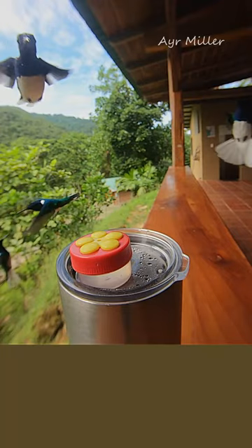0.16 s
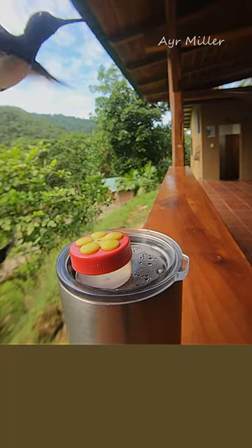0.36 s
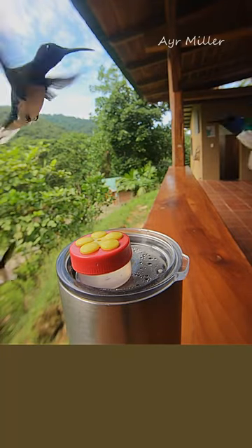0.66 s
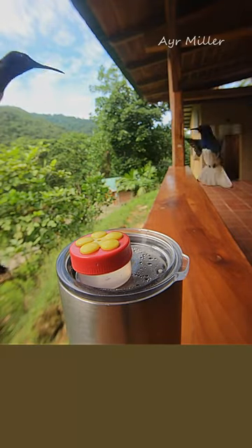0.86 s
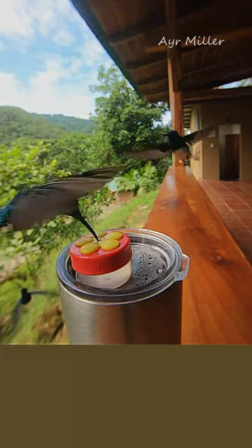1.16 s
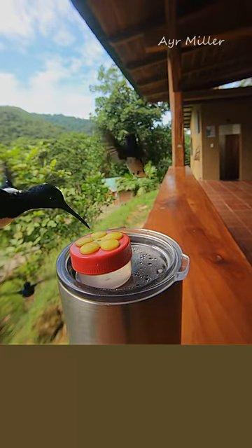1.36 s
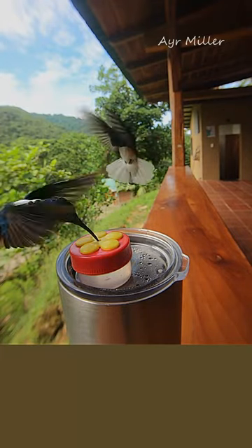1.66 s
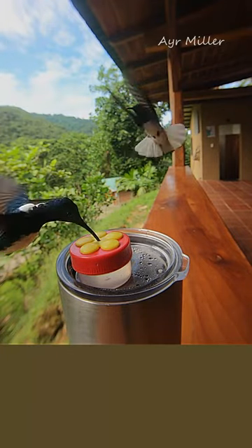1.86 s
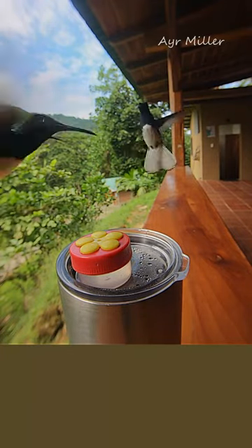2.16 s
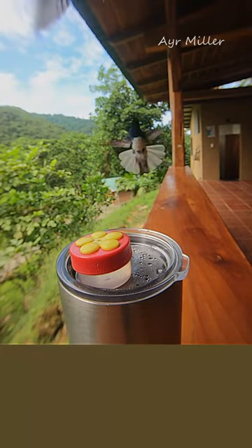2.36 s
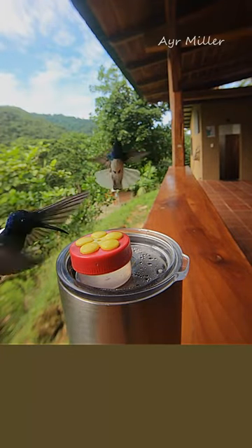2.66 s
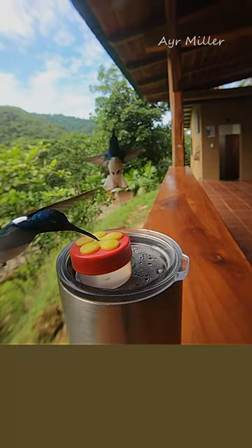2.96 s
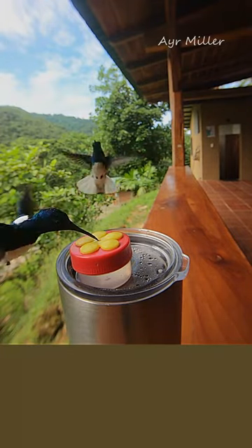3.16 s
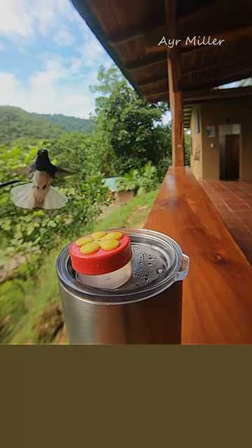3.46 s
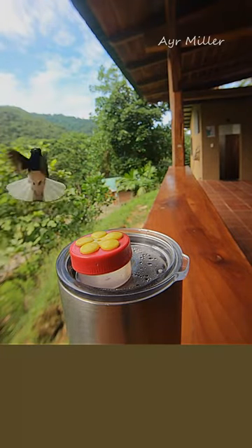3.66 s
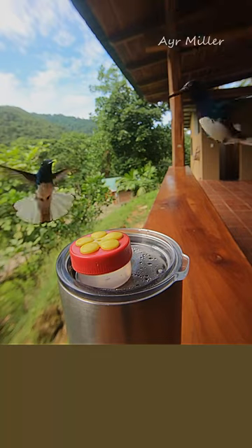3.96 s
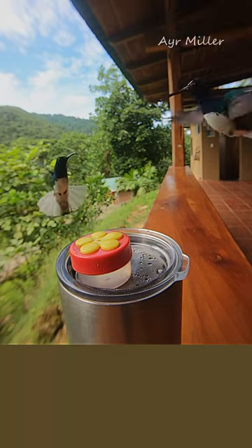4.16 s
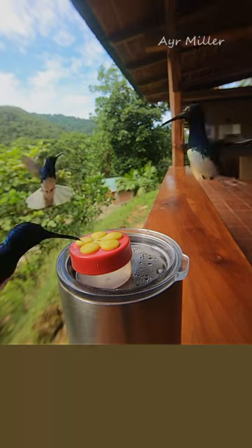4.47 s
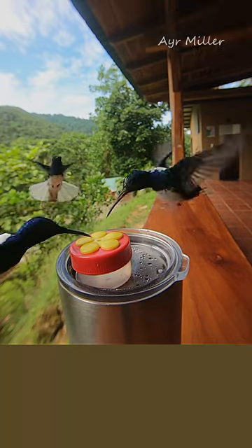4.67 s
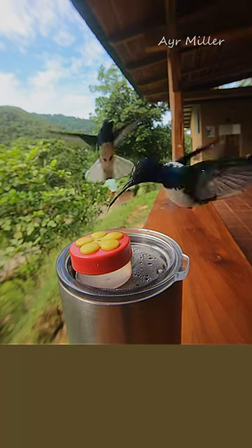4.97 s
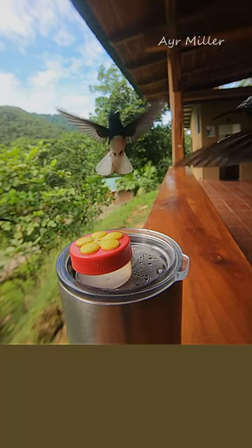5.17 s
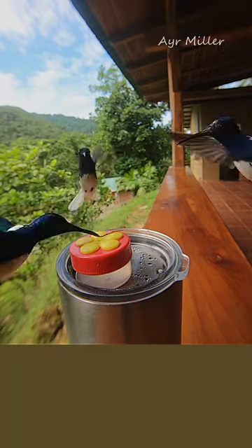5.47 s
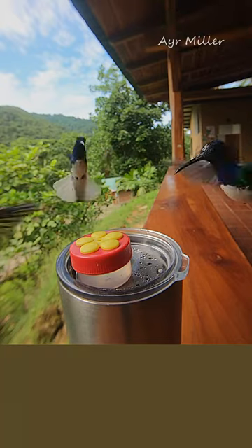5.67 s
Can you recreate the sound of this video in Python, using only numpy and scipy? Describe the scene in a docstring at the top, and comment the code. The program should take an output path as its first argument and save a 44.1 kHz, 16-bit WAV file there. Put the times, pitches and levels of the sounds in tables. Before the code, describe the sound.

Hummingbirds hover and dart close to a microphone on an open veranda. From 0 s low wing hums, roughly 30 to 40 soft beats per second, pulse with airy puffs and dry feather flicks; a clear tick lands at 0.1 s and a quick falling chirp at 0.55 s. After a brief thinning near 0.7 s, passes swell at 1.3 and 1.5 s, then a steady hover leads into a stronger, faster rush at 2.15 s. A quieter gap follows, then a steady purr from 2.6 to 3.4 s and another surge at 3.5 s. A small snap at 3.75 s precedes renewed hovering; the loudest rush comes around 4.9 s with a sharp snap. Overlapping hums stay strong to the end, near 5.8 s. Behind are faint leaf hiss, shimmering insects peaking near 3.65 s, sparse weak high chips, thin flickering high tones and farther wings, with short diffuse echoes.

```python
"""Low fluttering hums swell and dart past close by: hummingbirds around a feeder on a veranda.
Each wing stroke is a soft pulse of locked wingbeat multiples, a puff of shaped noise and feather flicks.
Beaks and feathers tick as snaps or short rings, and chips are gliding sines; both get diffuse echoes.
Behind them, filtered noise makes leaf hiss and an insect chorus, sines make thin high tones,
and two more birds hum farther off."""
import sys
import numpy as np
from scipy import signal
from scipy.fft import rfft, irfft, next_fast_len
from scipy.io import wavfile

SR = 44100
rng = np.random.default_rng(int(sys.argv[2]) if len(sys.argv) > 2 else 0)


def wav_out(sig):
    """Save sig, one row per channel (or a flat mono array), as 16-bit PCM at SR to the path in sys.argv[1]."""
    wavfile.write(sys.argv[1], SR, np.round(np.clip(np.atleast_2d(sig).T, -1, 1) * 32767).astype(np.int16))


N = 255942
T = np.arange(N) / SR


def gain_of(db):
    """Decibels to gain."""
    return 10 ** (np.asarray(db) / 20)


def evened(x):
    """Scales to rms 1."""
    return x / np.sqrt(np.mean(x ** 2) + 1e-20)


def add(mix, start_s, sound):
    """Mixes a sound in at start_s seconds, cut at the end of the mix."""
    part = mix[round(start_s * SR):][:len(sound)]
    part += sound[:len(part)]


def noise(points, size=N):
    """Steady noise of rms 1, its spectrum drawn through (frequency [Hz], relative density [dB])."""
    point_hz, point_db = np.transpose(points)
    count = next_fast_len(size)
    hz = np.fft.rfftfreq(count, 1 / SR)
    shape_db = np.interp(np.log(hz + 1), np.log(point_hz + 1), point_db)
    spectrum = rfft(rng.standard_normal(count)) * gain_of(shape_db)
    return evened(irfft(spectrum, count)[:size])


def drift(hz, t=T):
    """Slow chance wandering with rates up to hz, rms about 1."""
    curve = evened(signal.resample(rng.standard_normal(200), 4000))
    return np.interp(t * hz * 40 % 4000, np.arange(4000), curve)


def ring(x, hz, width):
    """Two-pole resonance of peak gain 1, width in Hz."""
    return signal.lfilter(*signal.iirpeak(hz, hz / width, SR), x)


def leaf_hiss():
    """Leaves in the trees hiss as broad noise whose level wanders slightly."""
    # hiss spectrum: (frequency [Hz], relative density [dB])
    leaf_spectrum = [(120, -18), (200, 8.5), (359, -4.5), (863, -11.5), (929, -11.5), (1100, -12),
                     (1440, -18.5), (2080, -17), (2490, -22.5), (3400, -14.5), (4480, -10.5), (11200, -25),
                     (15800, -42)]
    level_db = -40.5 + 0.84 * drift(hz=4.)
    return gain_of(level_db) * noise(leaf_spectrum)


def insect_chorus():
    """Many insects merge into narrow bands of noise, each shimmering in level."""
    # level of the whole chorus: (time [s], level [dB])
    chorus_level = [(0, -63), (.6, -47), (1.5, -46), (2.5, -45.5), (3.5, -43.5), (3.65, -40.5),
                    (3.8, -43.5), (4.6, -47.5), (5.1, -53.5), (5.8, -56)]
    # chorus bands: (centre [Hz], width of each of two filter passes [Hz], relative level [dB])
    insect_bands = [(4480, 600, 0.5), (4788, 110, -5.5), (5190, 620, -6.5), (3730, 970, -3.5),
                    (4443, 21, -8), (4680, 45, -8.5), (4860, 25, -12.5), (4350, 30, -9)]
    chorus = np.zeros(N)
    for hz, width, db in insect_bands:
        band = ring(ring(rng.standard_normal(N), hz, width), hz, width)
        chorus += gain_of(db + 1.8 * drift(hz=25.)) * evened(band)
    return evened(chorus) * gain_of(np.interp(T, *np.transpose(chorus_level)))


def faint_tones():
    """Thirty faint high sines come and go by chance, each wavering in phase."""
    # the spread of tones: lowest [Hz], highest [Hz], gain ahead of the chance swells [dB]
    low_hz, high_hz, gain_db = 6500, 11400, -63
    pitches = np.linspace(low_hz, high_hz, 30) + rng.uniform(-80, 80, 30)
    tones = np.zeros(N)
    for hz in pitches:
        swell = np.clip(drift(hz=4.) - .7, 0, 1)  # silent unless the drift is high
        tones += swell * np.sin(2 * np.pi * hz * T + .6 * drift(hz=8.))
    return gain_of(gain_db) * tones


def thin_tones():
    """Thin high tones: sines of steady pitch that fade in and out and flicker."""
    # clearest high tones: (start [s], end [s], pitch [Hz])
    high_tones = [(0, 1.1, 10800), (.05, 1.05, 9430), (0.698, 1.26, 8550), (.9, 1.7, 6740),
                  (1.0, 2.0, 9360), (1.545, 2.6, 8400), (2.0, 3.12, 9360), (3.7, 4.27, 10900),
                  (3.8, 4.26, 9360), (4.6, 5.2, 10651), (5.1, 5.482, 9360)]
    out = np.zeros(N)
    for start, end, hz in high_tones:
        fade = np.clip(np.minimum(T - start, end - T) / .08, 0, 1)
        level_db = -61 + 3 * drift(hz=7.)
        out += fade * gain_of(level_db) * np.sin(2 * np.pi * hz * T + 1.6 * drift(hz=10.))
    return out


def far_birds():
    """Two more birds hover farther off, their wingbeat and level wandering."""
    # level that both wander around: (time [s], level [dB])
    far_level = [(0, -39.5), (.9, -41), (1.3, -35), (2.2, -48), (2.5, -36.5), (3.3, -42.5), (3.7, -36.5),
                 (4.5, -30.5), (5.0, -31), (5.8, -28.5)]
    level_db = np.interp(T, *np.transpose(far_level))
    out = np.zeros(N)
    for hz in (31., 35.):
        wingbeat_hz = hz + 1.2 * drift(hz=1.5)
        out += wings(T, wingbeat_hz, level_db + 2 * drift(hz=3.), -.5, uneven_db=2.5)
    return out


def chips():
    """Short bird whistles: sines that glide in pitch, lose level and have soft ends."""
    # chips: (start [s], length [s], start pitch [Hz], end pitch [Hz], level ahead of the fall [dB])
    calls = [(0.545, 0.0045, 7500, 5140, -27.5), (0.546, 0.014, 4960, 2600, -25.5),
             (0.56, 0.0081, 4280, 4300, -22.5), (1.161, 0.048, 10530, 10400, -44),
             (1.18, 0.034, 9800, 9600, -45), (2.4, .055, 6960, 6950, -46), (2.435, 0.034, 7900, 7750, -47),
             (2.563, 0.045, 9800, 8500, -46), (2.9, 0.033, 6500, 6300, -44), (3.653, 0.03, 8020, 8050, -43),
             (3.83, 0.058, 7900, 7850, -45), (4.028, 0.039, 9400, 6700, -44), (4.128, .03, 9400, 9300, -45),
             (4.342, 0.019, 7600, 7500, -40)]
    out = np.zeros(N)
    for start, length, start_hz, end_hz, db in calls:
        u = np.linspace(0, 1, round(length * SR))
        glide_hz = start_hz + (end_hz - start_hz) * u
        whistle = np.sin(2 * np.pi * np.cumsum(glide_hz) / SR)
        add(out, start, gain_of(db - 9. * u) * whistle * signal.windows.tukey(len(u), .5))
    return out


def ticks():
    """Beaks and feathers tick: a down-up snap, or a softer brush of grit with a short ring."""
    # ticks: (start [s], gain [dB], ring pitch [Hz], snap share [0-1])
    taps = [(0.121, -14, 2530, 0.8), (0.719, -35, 7140, 0.2), (1.115, -35, 6900, 0.2),
            (2.299, -36, 6500, 0.1), (3.339, -32.5, 2595, 0.24), (3.747, -19.5, 7450, 0.92),
            (4.866, -9.5, 7890, 0.99), (4.923, -27, 2980, 0)]
    out, t = np.zeros(N), np.arange(400) / SR
    snap_hz = 6500
    snap = -np.sin(2 * np.pi * snap_hz * t) * (t < 1 / snap_hz)  # a single cycle
    for start, db, hz, share in taps:
        grit = 0.52 * rng.standard_normal(400) * np.exp(-t / 0.0011)
        ringing = 1.3 * np.sin(2 * np.pi * hz * t) * np.exp(-t / 0.0014)
        brush = np.clip(1 - share, 0, 1) * (grit + ringing)
        add(out, start, gain_of(db) * (share * snap + brush))
    return out


def veranda(x, t60=0.18):
    """Diffuse echoes from roof, wall and trees: a decaying noise tail centred on 5 kHz."""
    t = np.arange(SR // 2) / SR
    tail = rng.standard_normal(len(t)) * gain_of(-60 * t / t60) * (t > .006)
    echo = ring(tail, 5000., 4000.) / np.linalg.norm(tail)
    return signal.fftconvolve(x, echo)[:N]


def flicks(beat):
    """Feathers flick at random, mostly as the wing turns: a dry edge and a short ring, sizes uneven."""
    flicks_per_s = 90.  # on average
    chance = flicks_per_s / SR * 2 * np.cos(beat - .9) ** 2
    draw, size = rng.random(len(beat)), rng.exponential(1, len(beat))
    strength = gain_of(3.4 * np.minimum(size, 2.4))
    clicks = (draw < chance) * strength * rng.choice([-1, 1], len(beat))
    edge = np.convolve(clicks, [-.5, -.5, .5, .5], "same")
    ringing = ring(clicks, 1150., 600)
    return gain_of(-30.) * (.35 * edge + 20 * ringing)


def wings(t, hz, level_db, sharp_db, uneven_db, whoosh_db=-13.0):
    """Locked multiples of the wingbeat make the pulse; turbulence puffs on the down and up stroke."""
    # pulse of one stroke: (multiple of the wingbeat, relative level [dB])
    stroke = [(1, -15), (2, -4), (3, -1.5), (4, -4.5), (5, -11.5), (6, -16), (7, -24.5), (8, -23),
              (9, -23.5), (10, -36.5), (12, -36)]
    # turbulence spectrum: (frequency [Hz], relative density [dB])
    whoosh = [(45, -49), (70, -2.5), (150, -0.5), (300, -12), (550, -23), (800, -27.5), (1100, -23),
              (1700, -32), (3000, -31.5), (6000, -40.5), (15000, -49)]
    beat = 2 * np.pi * (np.cumsum(hz) / SR + rng.random())

    skew, spread = -1.55, .04  # [rad]: puts a dip before the peak; phase slip per multiple
    order, order_db = np.transpose(stroke)
    hum = np.zeros(len(t))
    for k in range(1, 13):
        wobble_db = uneven_db * drift(9., t)  # the wing angle shifts each multiple a little
        slip = spread * k * drift(6., t)
        db = np.interp(k, order, order_db) + sharp_db * (k - 3) + wobble_db
        hum += np.sqrt(2) * gain_of(db) * np.cos(k * beat + skew + slip)

    down, up, lag = .45, .3, .5  # depth of the puffs once and twice a beat; their phase [rad]
    gate = np.exp(down * np.cos(beat + lag) + up * np.cos(2 * (beat + lag)))
    gust_db = 1.74 * np.clip(drift(12., t), -2, 1.5)
    puffs = gate * noise(whoosh, size=len(t)) * gain_of(whoosh_db + 2.36 * sharp_db + gust_db)
    puffs += flicks(beat) * gain_of(1.7 * (hz - 38))  # faster wings flick harder
    puffs *= gain_of(-.25 * (level_db + 20.5))  # puffs and flicks grow less than the hum as a bird nears
    return gain_of(level_db) * (hum + puffs)


def faded(t, sound):
    """Fades a flight in and out; one already under way starts at full level."""
    fade_s = 0.036
    under_way = t[0] < .02
    edge = np.minimum(t - t[0] + under_way, t[-1] - t)
    return t[0], sound * np.clip(edge / fade_s, 0, 1)


def hover(arrive, leave, hz_in, hz_out, db_in, db_out, sharp_db):
    """A bird holds still: wingbeat and level slide evenly over the stay and bob a little."""
    t = np.arange(arrive, leave, 1 / SR)
    hz = np.linspace(hz_in, hz_out, len(t)) + 0.387 * drift(3., t)
    level_db = np.linspace(db_in, db_out, len(t)) + 1.83 * drift(8., t)
    return faded(t, wings(t, hz, level_db, sharp_db, uneven_db=0.16))


def hovering_birds():
    """Birds hold still near the feeder, each stay a hum of its own."""
    # stays: (arrive [s], leave [s], wingbeat on arriving [Hz], on leaving [Hz],
    #         level on arriving [dB], on leaving [dB], sharpness [dB per multiple])
    stays = [(0, .3, 35, 31.2, -25.5, -32, 1.5), (0, 0.297, 36.9, 35, -32.5, -33, 2),
             (0.258, 0.687, 32.33, 28.8, -26.5, -33, 0.2), (0.779, 1.09, 31.16, 31, -35, -28, -0.6),
             (1.081, 1.236, 36.14, 37, -22, -27, -0.03), (1.31, 1.483, 36.43, 35.5, -27.5, -26, 0.36),
             (1.57, 2.056, 34.76, 32.8, -24, -22.5, -0.46), (2.363, 2.536, 30.8, 34, -37, -37, -1),
             (2.62, 3.428, 33.2, 29.7, -27, -26.5, -0.17), (3.898, 4.313, 34.51, 28.3, -24, -31.5, -0.55),
             (4.36, 4.977, 34.15, 36.5, -23.5, -19.5, -0.35), (5.03, 5.228, 33.3, 31.7, -21.5, -31, -1.1),
             (5.23, 5.5, 31.26, 36.5, -24, -24, 0.44), (5.36, 5.585, 36.3, 37, -23, -21.5, 0.25),
             (5.547, 5.854, 37.42, 37.2, -17.5, -17.5, -0.4)]
    out = np.zeros(N)
    for stay in stays:
        add(out, *hover(*stay))
    return out


def dart(nearest, approach, retreat, top_hz, top_db, sharp_db):
    """A bird darts past: wingbeat and level share one arch that peaks as it is nearest."""
    fall_db, sag = -10.5, 0.1514  # at both ends: level drop [dB], wingbeat drop [share]
    t = np.arange(nearest - approach, nearest + retreat, 1 / SR)
    away = np.where(t < nearest, (nearest - t) / approach, (t - nearest) / retreat) ** 2
    hz = top_hz * (1 - sag * away)
    level_db = top_db + fall_db * away
    return faded(t, wings(t, hz, level_db, sharp_db, uneven_db=0.88))


def darting_birds():
    """Birds dart past, each a brief swell of wingbeat and level."""
    # passes: (nearest [s], approach [s], retreat [s], top wingbeat [Hz], top level [dB],
    #          sharpness [dB per multiple])
    passes = [(.722, 0.058, 0.048, 34.7, -21, .6), (1.27, 0.083, 0.066, 40.06, -20.5, -0.03),
              (1.53, 0.087, 0.072, 38.58, -19, -0.2), (2.15, .17, 0.198, 41.44, -19, -0.17),
              (2.586, 0.072, 0.11, 33.33, -22.5, 0.36), (3.47, 0.083, 0.089, 37.48, -21, 0.68),
              (3.83, .1, 0.052, 33.1, -26.5, 1.5), (4.5, 0.062, .05, 36.6, -26.5, 0),
              (4.92, .11, .15, 40.57, -17, 0.13)]
    out = np.zeros(N)
    for flight in passes:
        add(out, *dart(*flight))
    return out


def scene():
    """Trees and far birds behind, calls and ticks with echoes, birds near."""
    behind = leaf_hiss() + insect_chorus() + faint_tones() + thin_tones() + far_birds()
    calls, snaps = chips(), ticks()
    echoes = veranda(gain_of(-0.5) * calls + gain_of(-29.0) * snaps)
    near = hovering_birds() + darting_birds()
    return (behind + calls + snaps + echoes + near)[None]


def record(dry):
    """The microphone rolls off the deep bass; then a steep low-pass limits the band."""
    x = signal.sosfilt(signal.butter(2, 30., "high", fs=SR, output="sos"), dry)
    edge_hz = 15780
    low_pass = signal.firwin(1023, edge_hz, window=("kaiser", 9), fs=SR)
    return signal.oaconvolve(x, low_pass[None], "same")


dry = scene()
out = record(dry)
wav_out(out)
```